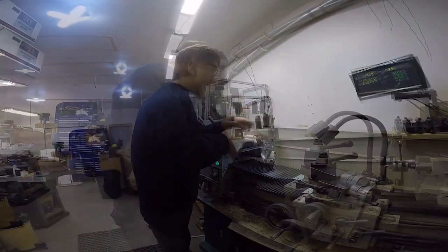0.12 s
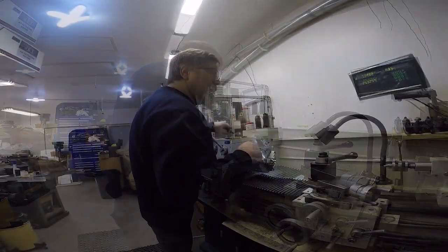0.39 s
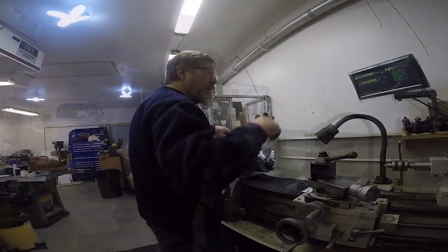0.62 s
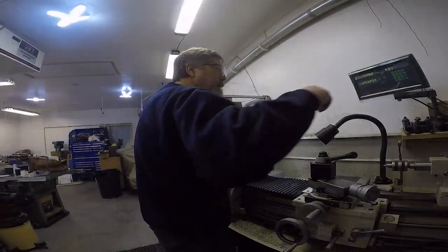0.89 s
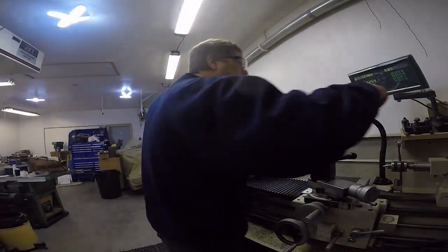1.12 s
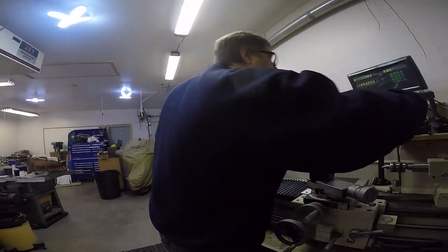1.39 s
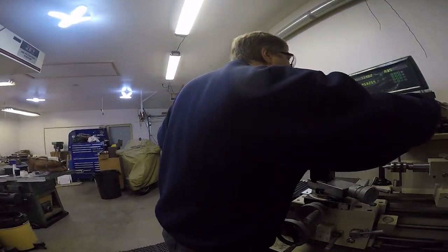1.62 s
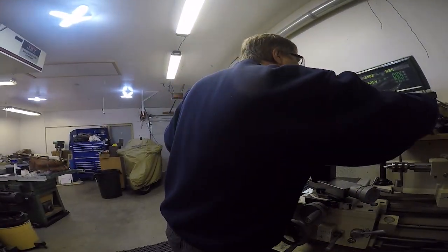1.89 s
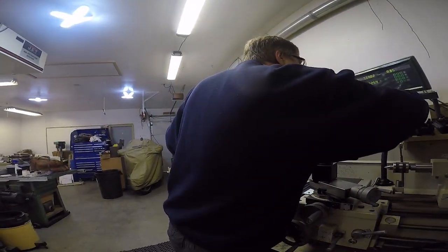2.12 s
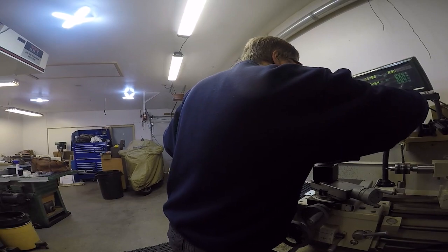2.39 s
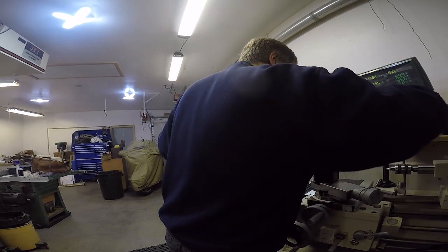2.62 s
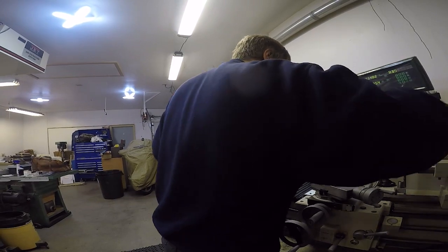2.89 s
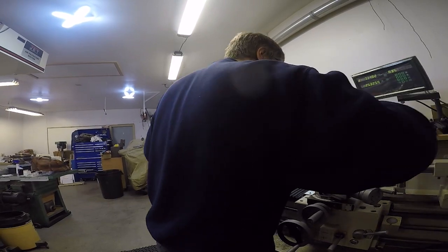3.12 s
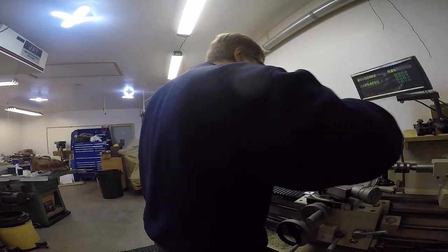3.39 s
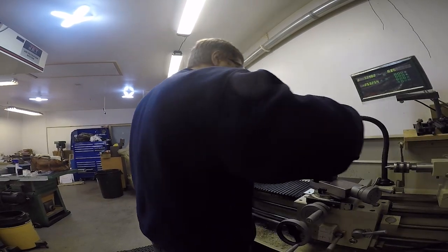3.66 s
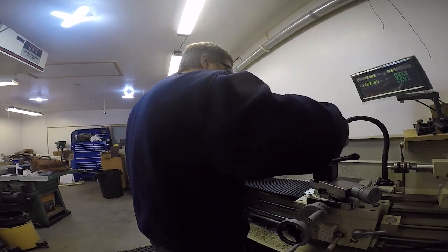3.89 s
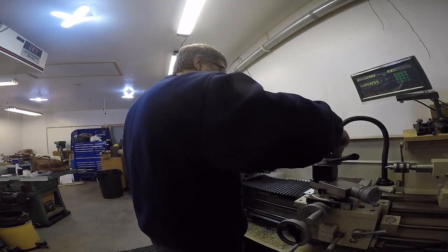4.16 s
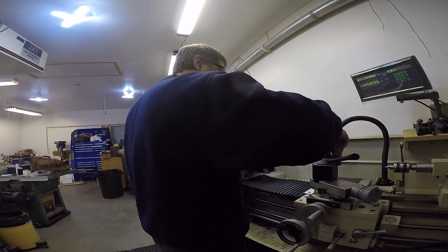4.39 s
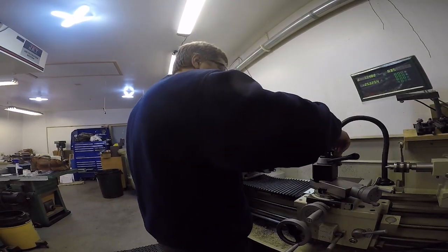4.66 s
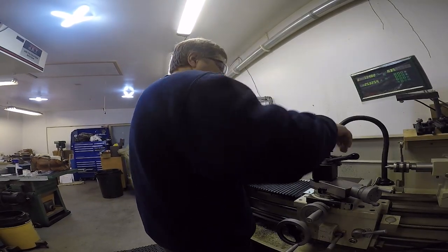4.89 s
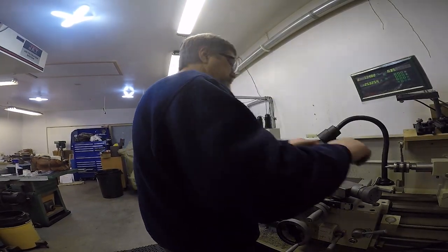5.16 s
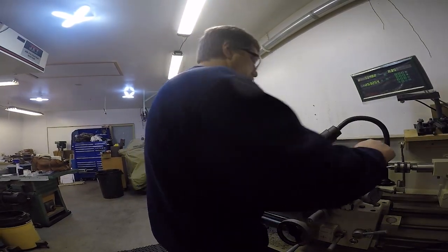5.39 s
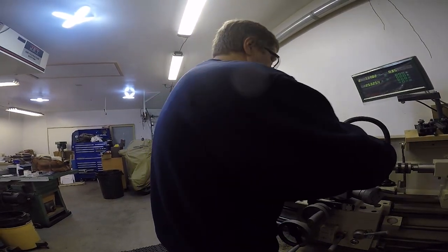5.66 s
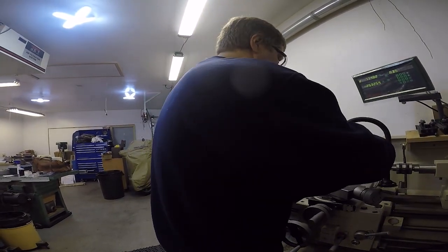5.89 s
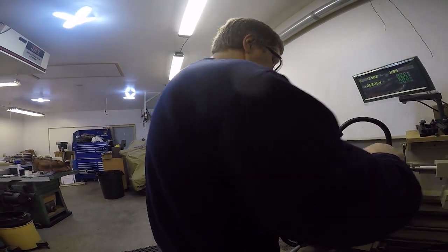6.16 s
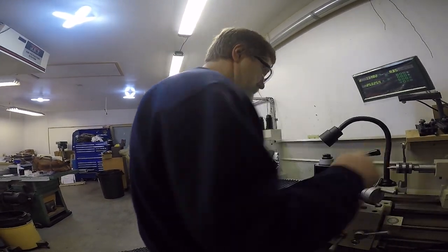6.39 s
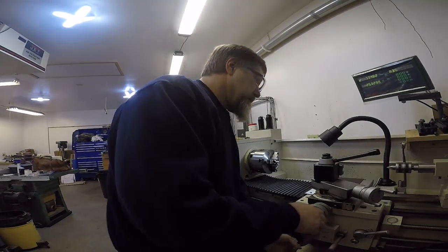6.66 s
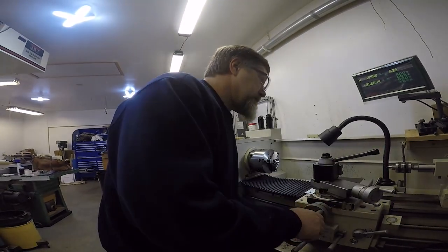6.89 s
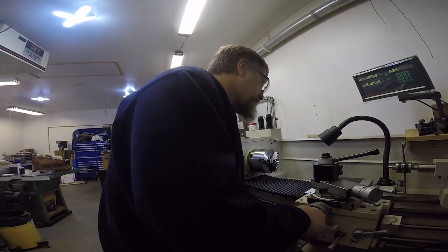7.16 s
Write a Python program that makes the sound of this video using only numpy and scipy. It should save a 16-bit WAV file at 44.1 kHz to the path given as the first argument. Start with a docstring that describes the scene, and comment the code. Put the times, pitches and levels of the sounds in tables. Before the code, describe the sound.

In a quiet workshop a metal tool holder clatters onto a shelf and rocks, another is knocked and clamped onto a lathe, then a handwheel rattles.

```python
"""A quiet home workshop with the lathe at rest, over a lamp hum, air rumble and microphone hiss.
Hands brush past and faint knocks sound; then a tool holder is set down on a shelf and rocks, ringing its modes.
Once something squeaks very high, a gliding sine. Another holder is knocked onto the tool post and clamped,
so the bed and its stand boom. Last a handwheel is cranked, its loose handle clicking and rattling.
The room answers the metal with a decaying tail of filtered noise."""
import sys
import numpy as np
from scipy import signal
from scipy.io import wavfile

SR = 44100
rng = np.random.default_rng(int(sys.argv[2]) if len(sys.argv) > 2 else 0)


def to_wav(s):
    """Save 16-bit WAV."""
    ch = np.atleast_2d(s).T  # columns
    pcm = np.round(np.clip(ch, -1, 1) * 32767)  # PCM
    wavfile.write(sys.argv[1], SR, pcm.astype(np.int16))


def voltage_ratio(decibels):
    """Convert decibels (scalar or array-like) to amplitude ratios, 20 dB per decade."""
    exponent = np.asarray(decibels, float) / 20
    return 10 ** exponent


N = 321048
BAND_EDGES_HZ = 20 * 2 ** np.arange(0, 10, .5)   # half octaves
# modes of bed, stand and tool post, undamped: (frequency [Hz], width [Hz], relative level [dB])
LATHE_MODES = [(58.6, 8.3, 13), (125, 11.3, -4.5), (176.4, 19.6, -1.5), (199.3, 6.4, -5.5),
               (266, 11.6, -3.5), (336.2, 8.5, -6), (416, 30.3, 2), (460.3, 9.9, -5.5), (509.4, 33.8, 5),
               (588, 40, 2), (686, 75, -5.5), (790, 83, -14), (1060, 210, -0.5), (1083, 95, -2.5),
               (1432, 94, -1), (1680, 260, 8), (1800, 150, 0.5), (2536, 410, 9), (3500, 400, 3),
               (2757, 130, 0.5), (2950, 190, -7), (4070, 165, 1), (4830, 230, 3.5), (5840, 88, -4.5),
               (6310, 110, -8), (6700, 90, -23), (8100, 330, -17), (11150, 190, -11), (13200, 460, -6)]


def rms_one(x):
    """Scale to rms 1."""
    return x / np.sqrt(np.mean(x ** 2) + 1e-20)


def at_hz(points, hz):
    """Read a spectrum on a log-frequency axis."""
    points = np.array(points)
    return np.interp(np.log(hz), np.log(points[:, 0]), points[:, 1])


def band(x, low_hz, high_hz):
    """Second-order band-pass."""
    return signal.sosfilt(signal.butter(2, [low_hz, high_hz], "band", fs=SR, output="sos"), x)


def drift(rate_hz):
    """Slow random wander of rms 1: noise through two equal low-pass poles at rate_hz."""
    hop = 40   # computed at every 40th sample
    r = np.exp(-2 * np.pi * rate_hz * hop / SR)
    settle = 2000
    noise = rng.standard_normal(N // hop + settle + 2)
    slow = signal.lfilter([1], [1, -2 * r, r * r], noise)[settle:]
    return np.interp(np.arange(N) / hop, np.arange(len(slow)), rms_one(slow))


def coloured_noise(spectrum, patchy_db):
    """Half-octave bands of noise, each with its own level; they flicker jointly and singly; rms 1."""
    white = rng.standard_normal((2, N))   # neighbouring bands take different noise
    together = drift(3.1)
    out = 0
    for k, (low, high) in enumerate(zip(BAND_EDGES_HZ, BAND_EDGES_HZ[1:])):
        flicker_db = patchy_db * (together + drift(22.0))
        level_db = at_hz(spectrum, np.sqrt(low * high))
        out = out + voltage_ratio(level_db + flicker_db) * band(white[k % 2], low, high)
    return rms_one(out)


def swells(rows):
    """Each row rises to its peak and fades, straight in dB; powers add."""
    rise_share = 0.72   # a swell rises in this share of its fading time
    t, power = np.arange(0, N, 40) / SR, 0
    for s, peak_db, fade_s in rows:
        fall = np.maximum((t - s) / fade_s, (s - t) / fade_s / rise_share)
        power = power + voltage_ratio(peak_db - 20 * fall) ** 2
    return np.interp(np.arange(N) / SR, t, np.sqrt(power))


def hum():
    """The lamp hums on a single sine whose level wavers slowly."""
    hum_hz, hum_db, waver_db = 239.5, -70, 1.8
    level = voltage_ratio(hum_db + waver_db * drift(2.8))
    return level * np.sin(2 * np.pi * hum_hz * np.arange(N) / SR)


def hiss():
    """Steady microphone hiss: noise with a fixed spectrum."""
    # (frequency [Hz], relative level [dB per Hz])
    hiss_spectrum = [(59, -5), (100, 5.5), (181, -6.5), (239, -18), (289, -30), (358, -8.5), (648, -12.5),
                     (1080, -12.5), (6020, -18), (12000, -28.5), (17000, -9)]
    return voltage_ratio(-63) * coloured_noise(hiss_spectrum, patchy_db=0)


def rumble():
    """Low, patchy air noise that swells as the man's movements push air at the microphone."""
    # (frequency [Hz], relative level [dB per Hz])
    rumble_spectrum = [(20, 6.5), (35, 4.5), (55, -3), (90, -11), (160, -24), (300, -46.5)]
    # gusts: (time of the peak [s], level [dB], time to fade by 20 dB [s])
    gusts = [(0.8, -59, 1), (2.13, -53.5, 0.5), (2.87, -47.5, 0.04), (4.2, -55, 1.5), (5.72, -54, 0.5),
             (6.43, -51.5, 1.0), (6.95, -45, 0.3), (7.28, -53.5, 1.5)]
    still_air_db = -56.5
    air = np.hypot(voltage_ratio(still_air_db), swells(gusts))
    return air * coloured_noise(rumble_spectrum, patchy_db=3.0)


def brushing():
    """Hands and sleeves brush the machine: soft noise in swells."""
    # (frequency [Hz], relative level [dB per Hz])
    brush_spectrum = [(100, -13), (180, -1), (350, 2), (500, -10), (800, -39), (2500, -27), (6000, -55)]
    # strokes: (time of the peak [s], level [dB], time to fade by 20 dB [s])
    strokes = [(0.0, -34.5, 0.24), (0.4, -59.5, 0.3), (0.75, -51.5, 0.3), (0.95, -56, 0.5), (1.23, -63, 1),
               (1.98, -60.5, 0.5), (2.2, -59, .5), (2.4, -62, 0.5), (3.1, -66, 0.9), (3.4, -39.5, 0.1),
               (3.62, -52.5, 0.5), (3.91, -40.5, 0.56), (4.46, -40, 0.49), (4.85, -52, 0.2),
               (5.35, -56, 0.54), (5.8, -34, 0.22), (6.08, -57, 1), (6.41, -52, 0.7), (6.69, -45.5, 0.22),
               (6.93, -41.5, 0.3), (7.28, -49, 0)]
    return swells(strokes) * coloured_noise(brush_spectrum, patchy_db=1.04)


def ring(clicks, hz, width_hz):
    """A unit click sets a sine of height 1 ringing; the wider the resonance, the sooner it dies."""
    r, w = np.exp(-np.pi * width_hz / SR), 2 * np.pi * hz / SR
    return signal.lfilter([0, np.sin(w)], [1, -2 * r * np.cos(w), r * r], clicks + 1e-18)


def ringing_modes(at, columns_hz, strengths_db, modes, body_db, rise_cycles, chatter_db, chatter_s,
                  damping, grip_hz, shaking):
    """Each blow excites every mode of the body, as strongly as its spectrum reaches there."""
    chatters_per_s = 1200
    spot_db = 2 * rng.standard_normal((len(at), len(modes)))   # no two blows land on the same spot
    chatter = voltage_ratio(chatter_db) * rng.standard_normal(N) * (rng.random(N) < chatters_per_s / SR)
    out = np.zeros(N)
    for (hz, width_hz, mode_db), spot in zip(modes, spot_db.T):
        clicks = np.zeros(N)
        strength_db = np.array([at_hz(np.c_[columns_hz, row], hz) for row in strengths_db])
        np.add.at(clicks, at, voltage_ratio(strength_db + mode_db + body_db + spot))
        # the loose part chatters in its seat for a moment; such light taps hardly move the low modes
        dying = signal.lfilter([0, 1], [1, -np.exp(-1 / SR / chatter_s)], clicks + 1e-18)
        clicks += min(1, hz / 900) * chatter * dying
        clicks += shaking * voltage_ratio(mode_db)
        width_hz = damping * width_hz + grip_hz
        # the motion spreads through the metal, so each mode swells over a few cycles
        out += ring(clicks, hz, width_hz) - ring(clicks, hz, width_hz + hz / rise_cycles)
    return out


def crunch(at, columns_hz, strengths_db, crunch_db, crunch_s):
    """The many small modes between the main ones blur to a dying burst of noise in each register."""
    contact_s = 0.0023   # the crunch builds while the faces meet, faster above 2500 Hz
    out = np.zeros(N)
    for hz, strength_db in zip(columns_hz, strengths_db.T):
        clicks = np.zeros(N)
        np.add.at(clicks, at, voltage_ratio(strength_db + crunch_db))
        decay_s = crunch_s + 4.7 / hz
        dying = signal.lfilter([1], [1, -np.exp(-1 / SR / decay_s)], clicks + 1e-18)
        meeting = np.exp(-max(1, hz / 2500) / SR / contact_s)
        dying = signal.lfilter([1 - meeting], [1, -meeting], dying)
        crowding = min(1, hz / 1300) * max(1, hz / 4000)   # modes crowd higher up
        burst = rng.standard_normal(N) * dying * np.sqrt(SR / 2 / hz) * crowding
        burst = band(burst, hz / 1.6, hz * 1.3)
        out += band(burst, hz / 1.8, min(hz * 1.5, .45 * SR))
    return out


def struck(blows, registers, modes, body_db, crunch_db, crunch_s, rise_cycles, chatter_db, chatter_s,
           damping=1, grip_hz=0, shaking=0):
    """Blows, each with a strength per register, ring a body's modes and raise a crunch."""
    # centre of each register of a struck body: {name: frequency [Hz]}
    registers_hz = {"boom": 58, "thump": 200, "body": 480, "knock": 1100, "click": 2500, "treble": 6500}
    blows = np.array(blows)
    columns_hz = np.array([registers_hz[name] for name in registers.split()])
    rising = np.argsort(columns_hz)
    columns_hz, strengths_db = columns_hz[rising], blows[:, 1:][:, rising]
    at = np.clip(np.round(blows[:, 0] * SR).astype(int), 0, N - 1)
    out = ringing_modes(at, columns_hz, strengths_db, modes, body_db, rise_cycles, chatter_db, chatter_s,
                        damping, grip_hz, shaking)
    if "treble" in registers:
        # the crunch reaches on above the treble
        spray_hz, under_treble_db = 12000, 14.0
        columns_hz = np.r_[columns_hz, spray_hz]
        strengths_db = np.c_[strengths_db, strengths_db[:, -1] - under_treble_db]
    return out + crunch(at, columns_hz, strengths_db, crunch_db, crunch_s)


def lathe():
    """Hard knocks ring the whole machine; a square blow, full and bright, also drives the bed."""
    # knocks on the tool post, relative levels: (time [s], click [dB], body [dB], knock [dB], treble [dB])
    post_blows = [(0.0034, -44.5, -32.5, -67, -50.5), (0.059, -47, -40, -75, -56),
                  (0.0842, -46, -41.5, -62, -55.5), (3.3195, -36, -28, -31, -57.5),
                  (3.332, -41, -28, -34, -65), (3.36, -44, -42, -41, -70), (3.598, -46, -30.5, -40, -75),
                  (3.704, -49, -31, -43, -76), (3.712, -25, -17.5, -30, -49),
                  (3.8286, -25, -24.5, -32.5, -59), (4.004, -34, -34, -41, -53.5),
                  (4.2702, -27, -31, -38.5, -51), (4.484, -34, -41, -41, -55),
                  (4.489, -29, -24, -42.5, -51), (4.809, -29.5, -32, -41.5, -76),
                  (4.8932, -45, -43.5, -57, -68), (5.5146, -39, -43, -44.5, -41.5),
                  (5.5985, -34.5, -34, -43, -62), (5.688, -43, -46, -51, -70),
                  (5.6983, -23, -16.5, -26, -30.5)]
    s, click, body, knock, treble = np.transpose(post_blows)
    thump = (body + treble) / 2 + 7   # the bed's thump follows body and treble
    boom = thump - 19   # the stand's boom follows the thump
    blows = np.c_[s, click, boom, thump, body, knock, treble]
    return struck(blows, "click boom thump body knock treble", LATHE_MODES, body_db=-0.91, crunch_db=-5.0,
                  crunch_s=0.0063, rise_cycles=6.5, chatter_db=-15.0, chatter_s=0.023)


def room(x):
    """A dense tail of echoes, each band of noise dying at its own rate, convolved with the sound."""
    # (frequency [Hz], time to die by 60 dB [s], relative level [dB])
    room_bands = np.array([(60, 0.72, -7), (200, 0.66, -7.5), (350, 0.57, -4), (614, 0.42, -3),
                           (1500, 0.38, -1), (3570, 0.39, -6), (7500, 0.43, -3), (13700, 0.2, -9)])
    first_echo_s = 0.007
    t = np.arange(int(.9 * SR)) / SR
    white, tail = rng.standard_normal((2, len(t))), 0
    for k, (low, high) in enumerate(zip(BAND_EDGES_HZ, BAND_EDGES_HZ[1:])):
        middle_hz = np.sqrt(low * high)
        t60 = at_hz(room_bands[:, [0, 1]], middle_hz)
        level_db = at_hz(room_bands[:, [0, 2]], middle_hz)
        tail = tail + band(white[k % 2], low, high) * voltage_ratio(level_db - 60 * t / t60)
    # silent until the first echo, full at twice its delay
    tail = tail * np.clip(t / first_echo_s - 1, 0, 1) / np.sqrt(.04 * SR)
    return signal.fftconvolve(x, tail)[:N]


def shelf():
    """The holder lands on the shelf and rocks; each contact rings holder and shelf."""
    # contacts, relative levels: (time [s], click [dB], body [dB], knock [dB], treble [dB])
    rocking_blows = [(0.5646, -15, -24.5, -15.5, -43), (0.5714, -20.5, -20, -29, -44),
                     (0.6908, -36, -31, -28, -60), (0.697, -42, -31, -33, -65),
                     (0.7024, -34, -24.5, -26, -65), (0.7924, -46, -27.5, -44, -50.5),
                     (0.8919, -31.5, -33, -36, -58), (0.8995, -33, -28.5, -27.5, -55),
                     (0.907, -33, -28, -28.5, -52.5), (1.0236, -40, -32, -34.5, -62),
                     (1.031, -42, -29.5, -26.5, -62), (1.0444, -43.5, -47, -32.5, -45.5),
                     (1.1024, -47.5, -38.5, -43, -65)]
    # modes of holder and shelf: (frequency [Hz], width [Hz], relative level [dB])
    shelf_modes = [(310, 45, -19), (345, 21, -14), (436, 7.5, -6), (494, 20, -2.5), (569, 26, -5),
                   (613.6, 63, 11.5), (761, 28, -8.5), (1080, 57, -5.5), (1140, 44, -5), (1310, 80, -28),
                   (1360, 45, -11.5), (1666, 47, -13), (2032, 91, -4.5), (2128, 80, -1.5),
                   (2353, 110, -0.5), (2467, 106, -2), (2706, 156, 1), (3190, 110, -0.5), (3440, 190, -1.5),
                   (4000, 170, -2.5), (4210, 46, -11), (4710, 62, -4), (4900, 47, -7), (5450, 170, -1),
                   (6000, 99, -2.5), (7000, 60, -26), (8060, 68, -7.5), (9200, 92, -22), (10700, 110, -9),
                   (13500, 80, -16)]
    return struck(rocking_blows, "click body knock treble", shelf_modes, body_db=-5.5, crunch_db=-12.0,
                  crunch_s=0.0071, rise_cycles=5.2, chatter_db=-14.5, chatter_s=0.047)


def pings():
    """Short pings, some with a blow and some alone: each one ring, quick to swell, at its own pitch."""
    # (time [s], level [dB], frequency [Hz], width [Hz])
    short_pings = [(0.570, -17, 619, 35), (0.701, -27, 612, 40), (0.903, -22, 613, 35),
                   (0.904, -30, 1140, 40), (0.7924, -56, 4850, 25), (0.5714, -27, 2140, 90),
                   (0.691, -28, 2720, 100), (0.8921, -29, 2740, 100), (0.8995, -27.5, 2110, 80),
                   (3.6029, -42, 2430, 90), (3.610, -42.5, 1710, 80), (3.7118, -20, 1800, 150),
                   (3.713, -27, 2700, 90), (3.829, -21, 2510, 150), (3.830, -56, 6970, 30),
                   (4.006, -50, 6180, 40), (4.003, -35.5, 1500, 200), (4.2701, -31, 2970, 200),
                   (4.272, -42, 5300, 250), (4.486, -29, 2930, 200), (4.490, -36.5, 4900, 250),
                   (4.8081, -28.5, 2900, 200), (4.810, -36, 1610, 200), (4.809, -39, 5060, 250),
                   (5.515, -37, 5100, 120), (5.5981, -30, 2680, 250), (5.700, -18, 2700, 120),
                   (6.134, -38.5, 495, 25), (6.7557, -46, 2590, 99.5), (6.770, -51, 2070, 25),
                   (6.706, -46, 903, 40), (6.773, -45, 2600, 50), (6.816, -43, 2720, 90),
                   (6.845, -52, 3040, 40)]
    out = np.zeros(N)
    for s, level_db, hz, width_hz in short_pings:
        start = int(s * SR)
        t = np.arange(min(SR // 5, N - start)) / SR
        height = voltage_ratio(level_db) * np.exp(-np.pi * width_hz * t) * (1 - np.exp(-hz * t / 0.77))
        out[start:][:len(t)] += height * np.sin(2 * np.pi * hz * t)
    return out


def squeak():
    """A thin, very high sine that jumps up a step, arches and falls."""
    # (time [s], frequency [Hz], rms level [dB])
    squeak_path = [(2.005, 12250, -95), (2.014, 12300, -81.5), (2.046, 12600, -77.5), (2.056, 12600, -81),
                   (2.058, 14050, -84), (2.07, 14360, -76), (2.098, 14890, -79), (2.144, 15000, -81),
                   (2.16, 14520, -74.5), (2.17, 14150, -94)]
    s, hz, level_db = np.transpose(squeak_path)
    t = np.arange(N) / SR
    height = np.sqrt(2) * voltage_ratio(np.interp(t, s, level_db, left=-200, right=-200))
    return height * np.sin(2 * np.pi * np.cumsum(np.interp(t, s, hz)) / SR)


def thuds():
    """Soft thuds of hand, lever and carriage reach only the low modes, damped by the hand."""
    # relative levels: (time [s], thump [dB], boom [dB], body [dB])
    soft_blows = [(3.35, -29.5, -59, -38), (4.027, -28, -33.5, -36), (4.08, -32, -39.5, -42.5),
                  (4.203, -30.5, -46, -54), (4.286, -33, -49, -33), (4.395, -25.5, -44.5, -37.5),
                  (4.508, -48, -50, -37), (5.303, -56, -80, -55), (5.531, -56, -67, -39),
                  (5.828, -35, -60, -41), (6.18, -52, -40.5, -53), (6.305, -25, -48, -60),
                  (6.361, -36, -70, -58), (6.497, -36, -70, -66), (6.64, -35, -72, -59),
                  (6.439, -26.5, -54, -68), (6.583, -24.5, -47, -62), (6.726, -29.5, -45, -61),
                  (6.888, -38, -41.5, -45), (6.918, -47, -40, -48), (7, -33, -46, -42),
                  (7.254, -38.5, -45.5, -42.5)]
    low_modes = [mode for mode in LATHE_MODES if mode[0] < 550]
    return struck(soft_blows, "thump boom body", low_modes, body_db=3.35, crunch_db=-2.0, crunch_s=0.0026,
                  rise_cycles=3.0, chatter_db=-21.0, chatter_s=0.055, damping=1.23, grip_hz=8.6)


def handle():
    """Clicks of the held handle are dry; let go, it rings, with uneven small taps while the wheel spins."""
    # clicks, relative levels: (time [s], click [dB], body [dB], knock [dB], treble [dB])
    blows = np.array([(6.691, -46, -55, -50, -52), (6.6945, -31.5, -48, -38, -43),
                      (6.8167, -47, -58, -40, -52), (6.869, -43, -65, -37.5, -48),
                      (6.8762, -31.5, -31, -58, -45), (6.9085, -43, -52, -50, -50),
                      (6.9135, -39, -46, -45, -39), (6.9458, -38.5, -40, -39, -37),
                      (6.9612, -36, -37, -51, -46), (6.979, -41, -27, -62, -54),
                      (6.9954, -50, -47, -43, -49), (7.1004, -57, -58, -66, -65),
                      (7.21, -29.5, -27.5, -34, -35), (7.2231, -52, -29, -58, -59),
                      (7.2493, -64, -41, -49, -69)])
    # modes of the free handle: (frequency [Hz], width [Hz], relative level [dB])
    handle_modes = [(517, 52, -1.5), (870, 115, -1.5), (1460, 300, -15), (3500, 430, -6.5), (7350, 900, -7),
                    (2415, 7, -16.5), (2455, 69, -2), (2382, 70, -0.5), (2680, 25, -11), (2900, 140, -2),
                    (4120, 55, -9), (4573, 190, 3.5), (4670, 126, -1), (5570, 280, 3), (6000, 83, -8),
                    (6390, 51, -10.5), (7700, 110, -19), (9200, 170, -16), (10500, 400, -11),
                    (11800, 400, -10), (13590, 500, -16), (14900, 500, -14)]
    spin_start_s, spin_length_s = 6.87, 0.13
    grows_db_per_s, dies_db_per_s, taps_per_s = 24, 900, 1500
    t = np.arange(N) / SR - spin_start_s
    # the handle shakes harder as the wheel spins, then stops
    rattle_db = -58 + grows_db_per_s * np.minimum(t, spin_length_s)
    rattle_db = rattle_db - dies_db_per_s * np.maximum(t - spin_length_s, 0)
    sizes = voltage_ratio(3.3 * np.minimum(rng.exponential(1, N), 4)) * rng.choice([-1, 1], N)
    taps = (t > 0) * voltage_ratio(rattle_db) * sizes * (rng.random(N) < taps_per_s / SR)
    free = np.abs(blows[:, 0] - spin_start_s - spin_length_s / 2) < spin_length_s
    ringing = struck(blows[free], "click body knock treble", handle_modes, body_db=-0.81, crunch_db=-9.5,
                     crunch_s=0.0055, rise_cycles=8.9, chatter_db=-14.0, chatter_s=0.013, shaking=taps)
    # a hand on the handle widens each of its modes by 25 Hz
    held = struck(blows[~free], "click body knock treble", handle_modes, body_db=-0.57, crunch_db=-9.0,
                  crunch_s=0.003, rise_cycles=8.0, chatter_db=-14.5, chatter_s=0.015, grip_hz=25.0)
    return ringing + held


def scene():
    """Metal in the room over the quiet background."""
    background = hum() + hiss() + rumble() + brushing() + squeak()
    metal = lathe() + shelf() + pings() + handle()
    soft = thuds()
    # the hand stays on, so less of a thud reaches the room
    echoes = room(metal + voltage_ratio(-2) * soft)
    return (metal + soft + echoes + background)[None]


def roll_off(x):
    """The treble ends steeply here."""
    return signal.sosfilt(signal.butter(12, 16440, fs=SR, output="sos"), x)


def record(dry):
    """The microphone rounds the highest peaks and the top is cut."""
    ceiling = 0.45
    rounded = ceiling * np.tanh(dry / ceiling)
    top_cut = signal.cheby2(12, 40, 16600, fs=SR, output="sos")   # 40 dB down from 16600 Hz up
    mix = signal.sosfilt(top_cut, rounded)
    return roll_off(mix)


dry = scene()
out = record(dry)
to_wav(out)
```